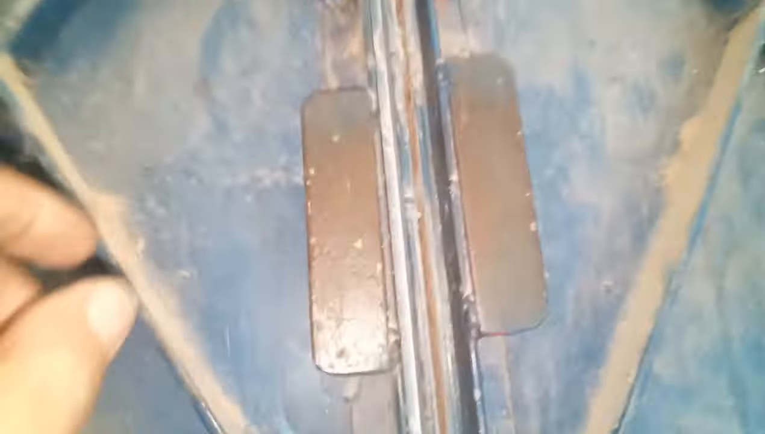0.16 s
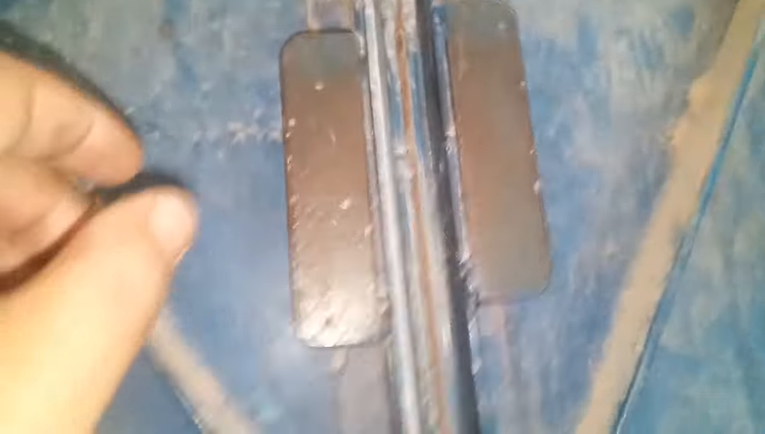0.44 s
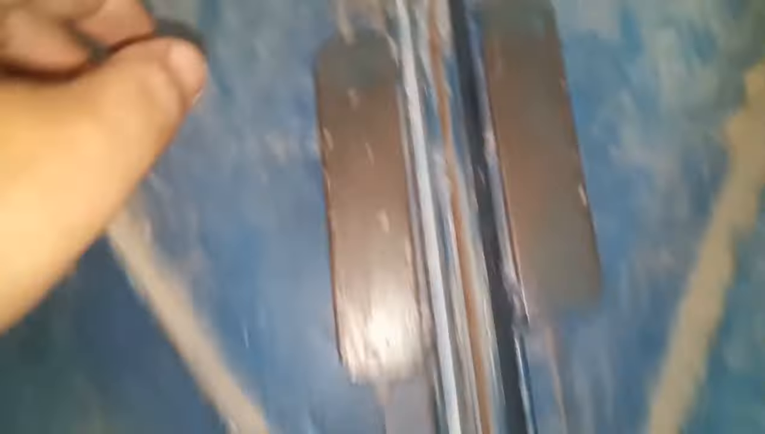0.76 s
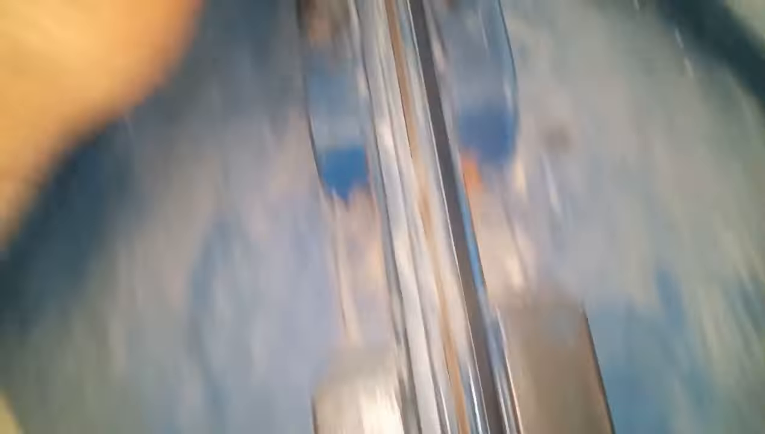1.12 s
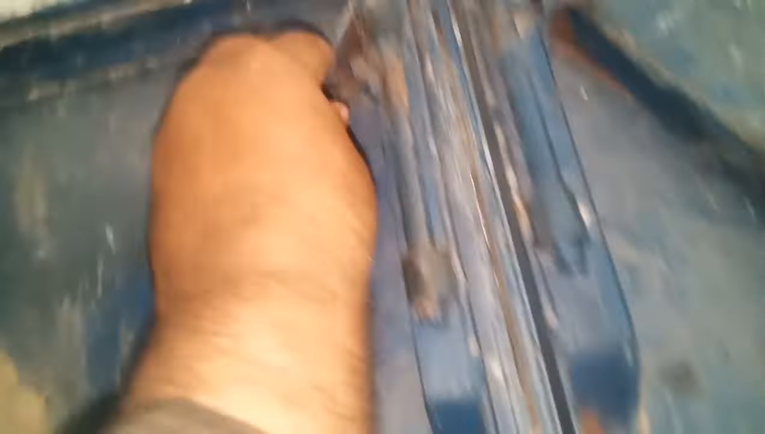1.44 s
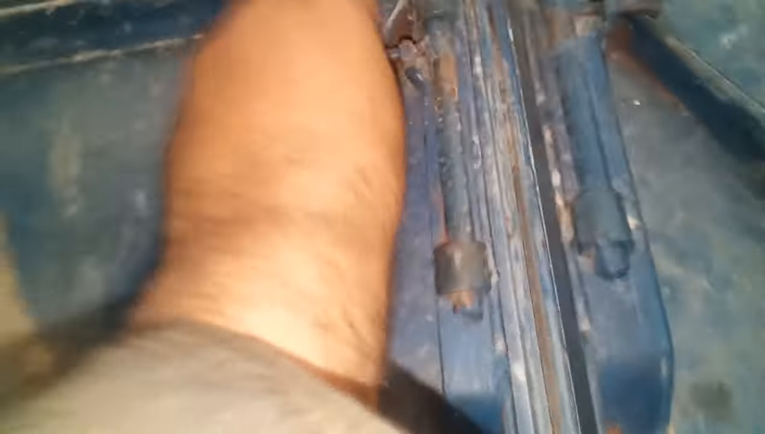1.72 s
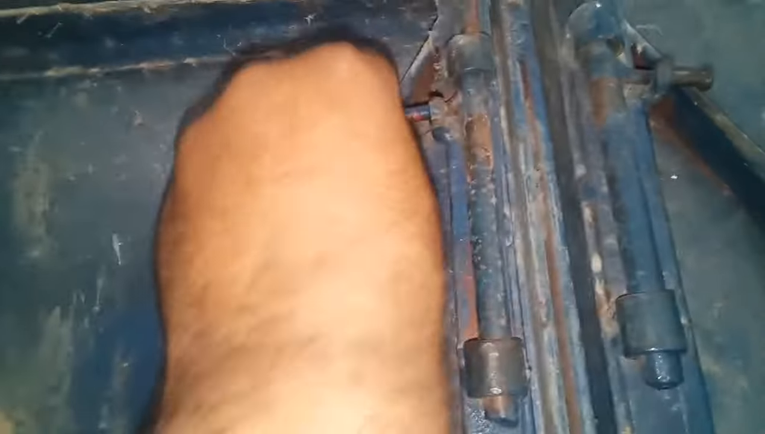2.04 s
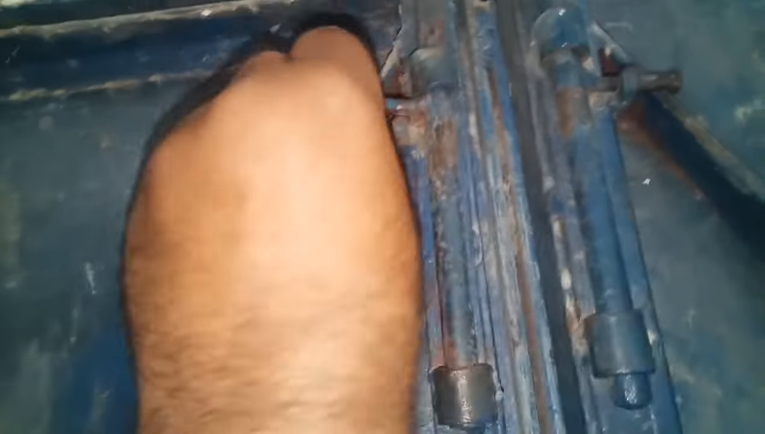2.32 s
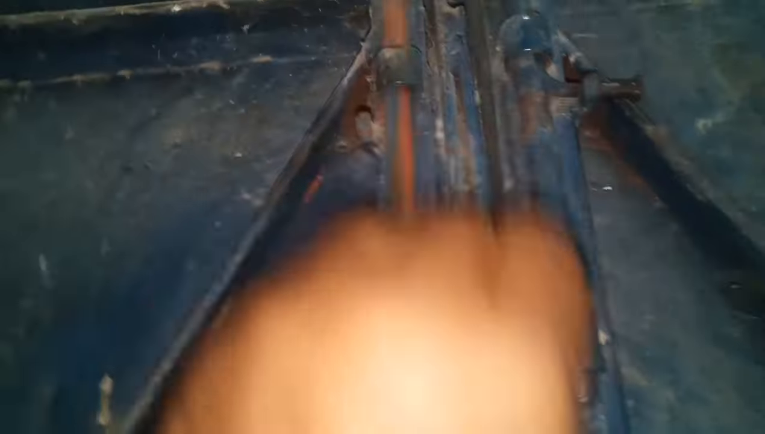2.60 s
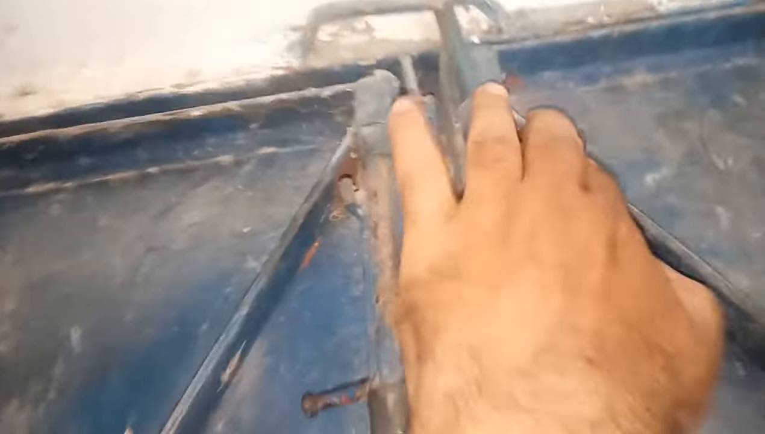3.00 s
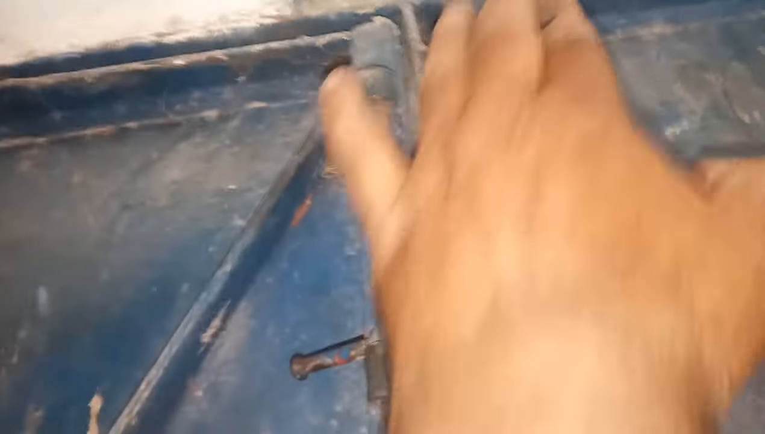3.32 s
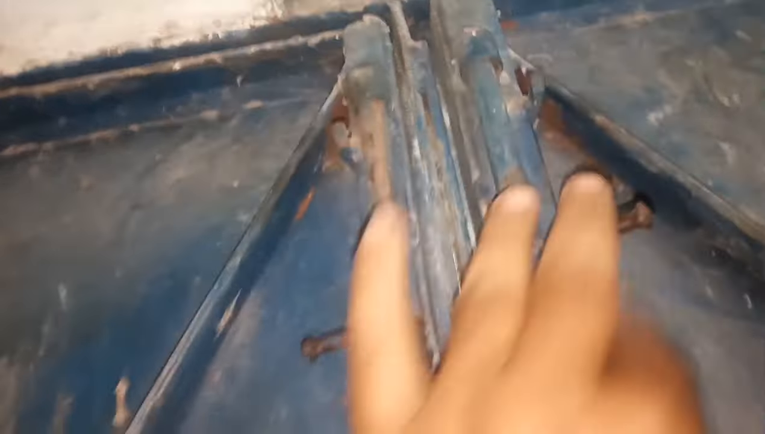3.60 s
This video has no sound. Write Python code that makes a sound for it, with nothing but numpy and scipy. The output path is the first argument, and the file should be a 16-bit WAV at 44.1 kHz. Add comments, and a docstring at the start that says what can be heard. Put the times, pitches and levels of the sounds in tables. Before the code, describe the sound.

Close up in a small room, faint touches on sheet steel give way to hard bolt clanks and gritty scraping, one short high squeal, a momentary dip, then sharp rattling as the door is shoved.

```python
"""Rusty steel door, small shop

A rusty sheet-steel door in a small shop, microphone at arm's length, over a faint steady hush.
A hand brushes the door, then works the stiff bolt: it clanks, grinds, groans and squeals once.
The ring breaks off and the level dips; then the door is shoved and rattles and scrapes in its frame.
Blows (noise bursts) and scrapes (random clicks) all ring the same synthetic panels and room; squeal,
groans, chirp and hum are unsteady tones, dull bumps are damped sines, rust powder is shaped noise."""
import sys
import numpy as np
from scipy import signal
from scipy.fft import rfft, irfft, next_fast_len
from scipy.io import wavfile
from scipy.ndimage import uniform_filter1d, minimum_filter1d

SR = 44100
rng = np.random.default_rng(int(sys.argv[2]) if len(sys.argv) > 2 else 0)


def unload_wav(signal):
    """Save mono or channel-first audio to the path in sys.argv[1] as 16-bit WAV at rate SR, clipped to [-1, 1]."""
    wavfile.write(
        sys.argv[1],
        SR,
        np.round(np.clip(np.atleast_2d(signal).T, -1, 1) * 32767).astype(np.int16),
    )


N = 165375  # 3.75 s

# Hush of the shop. Each row: frequency in Hz, colour in dB.
HUSH_COLOUR = [(18, -33), (30, 4.5), (1920, -10), (2310, -8), (2490, -9), (3590, -3.5), (15000, -41.5)]
HUSH_DB = -69  # rms

# Strong modes of the door. Each row: frequency in Hz, level in dB, free ring time t60 in s.
PANEL_MODES = [(166, 0, .6), (231, -3, .35), (264, -1, .35), (591, -3, .32), (730, -5, .25), (765, -3, .3),
               (1420, -4, .28), (1522, -4, .28), (1647, -4, .28), (2486, -6, .28)]
# Dense panel modes blended with the room. Each row: frequency in Hz, free ring time t60 in s.
DENSE_RING = [(100, 1), (300, 0.28), (800, 0.37), (2000, 0.23), (5000, 0.16), (12000, 0.073)]
CLANG_T60_S = 0.058
DENSE_RING_DB, PANEL_MODES_DB = 1.5, -13  # relative to the clang
PRESSED_RING = 0.58  # share of the ring time left while the steel is pressed and rubbed
# Zones driven separately: treble, bass, middle, fizz. Each row: lower edge in Hz, upper edge in Hz.
ZONES_HZ = [(1900, 6000), (40, 480), (480, 1900), (6000, 17000)]
# Door under a light hand. Each row: frequency in Hz, colour in dB.
BRUSH_COLOUR = [(35, -55.5), (60, -21.5), (127, -8), (163, -6.5), (253, -17.5), (938, -14), (1710, -6.5),
                (3040, 2.5), (3710, 4.5), (8000, -31), (15600, -51)]
# Door worked at the bolt. Each row: frequency in Hz, colour in dB.
BOLT_COLOUR = [(30, -40.5), (50, -29), (75, -21.5), (126, -13.5), (162, -1), (197, -7.5), (266, 2.5),
               (377, -10.5), (548, -13.5), (758, 1), (838, -7.5), (998, -8.5), (1490, -8), (3840, -3),
               (4460, -17.5), (6200, -30), (7160, -33.5), (9890, -46), (15500, -46.5)]
# Door shoved in its frame. Each row: frequency in Hz, colour in dB.
SHOVE_COLOUR = [(30, -54.5), (154, 1), (207, -7), (266, 1.5), (522, -9.5), (686, 1), (1250, 0),
                (1910, -4.5), (2500, 2.5), (3000, -0.5), (3600, -5.5), (4900, -17), (5400, -32),
                (6640, -42.5), (10000, -47), (15500, -51)]
GRIP_S = 1.43  # the hand takes hold of the bolt
BREAK_S = 2.809  # the ring breaks off
SHOVE_S = BREAK_S + .02  # from here the door is shoved

# Rust rubbing on rust. Each row: start in s, end in s, then treble, bass and middle force in dB.
STROKES = [(0.15, 0.272, -43, -65.5, -51), (0.269, 0.458, -50, -62.5, -60.5),
           (0.364, 0.406, -35.5, -77, -48), (0.728, 0.758, -59, -56, -56), (0.854, 1.214, -68.5, -73, -79),
           (1.315, 1.43, -60.5, -49, -58.5), (1.442, 1.526, -30, -17.5, -27.5),
           (1.523, 1.686, -36, -34.5, -34), (1.806, 1.848, -26, -23, -22.5),
           (2.224, 2.282, -24, -31.5, -30), (2.282, 2.439, -38.5, -45, -55), (2.438, 2.604, -35, -29, -24),
           (2.605, 2.689, -20.5, -21, -17), (2.716, 2.821, -31, -41, -31), (2.851, 2.967, -58, -52, -55.5),
           (2.974, 3.14, -67.5, -56.5, -69.5), (3.144, 3.192, -44, -35.5, -43),
           (3.203, 3.312, -30, -31.5, -27.5), (3.315, 3.412, -25.5, -31, -23.5),
           (3.458, 3.531, -20, -29.5, -23.5), (3.607, 3.718, -30, -32, -29.5)]
STROKE_EDGE_S, STROKE_FIZZ_DB = 0.017, -30  # fizz relative to the treble
GRAINS_PER_S, GRAIN_SPREAD_DB = 3000, 3.6
JUDDER_PER_S, JUDDER_DB = 110, 2.8  # pace, and dB per unit of drift

# Dull bumps: soft knocks, panel hum and a low thump as the ring breaks off. Each row: start in s,
# peak of the envelope in dB, pitch in Hz, rise and decay time in s.
BUMPS = [(0.234, -44.5, 168, 0.024), (.253, -39.5, 436, 0.00072), (.6, -33, 476, 0.0008),
         (.608, -49.5, 167, 0.0043), (.889, -49.5, 450, 0.001), (2.803, -31, 69, 0.0033)]

# Steel-on-steel blows. Each row: start in s, treble, bass and middle force in dB,
# chatter decay in s (1 ms at least), bite in dB.
BLOWS = [(1.4443, -27.5, -8.5, -20, .0083, 3), (1.4675, -23, -14.5, -33, 0.0039, 1),
         (1.5436, -23, -40.5, -32.5, 0.006, -5), (1.6026, -17, -20.5, -23, .003, 10),
         (1.6364, -17, -28, -12.5, 0.0065, 0.5), (1.6707, -27, -25.5, -19.5, 0.0051, -2.5),
         (1.7372, -17, -22, -17.5, .004, 7), (1.8025, -11, -15.5, -16.5, 0.0073, 6),
         (1.831, -20, -28, -25, .003, 3), (2.0941, -16.5, -19, -17.5, 0.0087, 6.5),
         (2.1715, -15, -26, -16.5, 0.0022, 12.5), (2.2155, -12.5, -23.5, -15, 0.006, 1.5),
         (2.4696, -21, -23.5, -22.5, 0.015, 4), (2.6085, -17, -23, -19, 0.0099, 4.5),
         (2.7055, -10, -33.5, -23, .004, 1), (2.7175, -14, -29.5, -25, 0.0021, 1),
         (3.1724, -9, -29, -20, .005, 6), (3.1874, -15, -27.5, -23.5, 0.015, 0),
         (3.3148, -16.5, -24, -23.5, 0.0082, 1.5), (3.3825, -19, -21.5, -28.5, 0.0046, 0),
         (3.4401, -14.5, -33.5, -13.5, 0.0086, -0.5), (3.488, -16, -29.5, -29, 0.0049, -1.5),
         (3.5725, -9.5, -30, -15.5, 0.004, 9.5)]
# Light touches on the panel. Each row: the same columns and units as the blows.
TOUCHES = [(0.636, -71, -54, -66, .003, 3), (1.2006, -38, -52.5, -44, 0.025, -3.5),
           (2.069, -56.5, -28, -47.5, 0.023, 0)]
CLICK_SHARE = 0.31  # first click beside chatter of unit energy
BLOW_FIZZ_DB = -29  # relative to the treble
BITE_HZ, BITE_WIDTH_HZ = 5430, 1250  # hard contact stresses this region

# Swells of sizzling rust powder. Each row: peak time in s, spread in s, rms level at the peak in dB.
HISSES = [(1.837, 0.0088, -39.5), (2.269, 0.02, -40), (2.658, 0.016, -39)]
# Sizzle of the powder. Each row: frequency in Hz, colour in dB.
HISS_COLOUR = [(3000, -37), (9500, -12), (13800, -3)]

# Brief groans, a chirp and a low hum. Each row: start in s, length in s, start pitch in Hz,
# end pitch in Hz, level in dB.
LOW_TONES_AND_CHIRP = [(3.3, 0.056, 250, 238, -24), (2.215, .07, 285, 259, -19.5),
                       (2.272, 0.043, 240, 125, -25), (2.247, 0.039, 1500, 2110, -20.5),
                       (2.37, .045, 105, 220, -36.5), (2.715, 0.1, 165, 165.4, -26)]
TONE_WOBBLE = .025  # share of the pitch per unit of drift

# Squeal of the bolt, before flutter and wobble. Each row: time in s, pitch in Hz, level in dB.
SQUEAL = [(2.316, 3520, -51.5), (2.323, 3470, -25.5), (2.335, 3410, -16), (2.346, 3407, -4.5),
          (2.364, 3305, -13.5), (2.381, 3361, -10.5), (2.401, 3190, -15), (2.426, 3223, -25.5),
          (2.477, 3254, -37.5)]
# Harmonics of the squeal, from the fundamental up. Each entry: level in dB.
SQUEAL_HARMONICS_DB = [2.5, -23.5, -45.5, -38]
SQUEAL_WOBBLE, SQUEAL_FLUTTER_DB = .024, 6  # share of the pitch and dB, per unit of drift
SQUEAL_ROOM_DB, SQUEAL_T60_S = -8.5, .25
SQUEAL_ROOM_TOP_HZ = 5000  # the room absorbs the overtones above this
# Modes of the bolt that ring on after the squeal. Each row: frequency in Hz, level in dB, t60 in s.
BOLT_MODES = [(3345, -37, .35), (3210, -32, .3)]
# Near reflections of the squeal. Each row: delay in s, level in dB.
ECHOES = [(.0073, -7.5), (0.017, -9.5), (0.036, -18)]

# The level dips briefly. Each row: start in s, end in s, gain in dB.
DIPS = [(2.69, 2.709, -10.5), (2.814, 2.87, -15)]
DIP_EDGE_S = 0.0035
CEILING, LIMIT_S = .88, .004
TOP_HZ = 15800


def undb(db):
    """Turn dB into an amplitude factor."""
    return 10 ** (np.asarray(db) / 20)


def unit(x):
    """Scale to unit energy."""
    return x / np.sqrt(np.sum(x ** 2) + 1e-18)


def on_log(hz, points):
    """Read (Hz, value) points on a log-frequency axis."""
    f, v = np.array(points).T
    return np.interp(np.log(hz + 1), np.log(f), v)


def shape(x, gain):
    """Causal minimum-phase filter with the gain curve gain(Hz), built by folding its cepstrum."""
    size = next_fast_len(len(x) + 8192) // 2 * 2
    hz = np.arange(size // 2 + 1) * SR / size
    cepstrum = irfft(np.log(gain(hz) + 1e-6))
    cepstrum[1:size // 2] *= 2
    cepstrum[size // 2 + 1:] = 0
    response = np.exp(rfft(cepstrum))
    return irfft(rfft(x, size) * response)[:len(x)]


def coloured_noise(colour):
    """Noise of rms 1 with the colour given by (Hz, dB) points."""
    noise = shape(rng.standard_normal(N), lambda hz: undb(on_log(hz, colour)))
    return np.sqrt(N) * unit(noise)


def band(x, lo, hi, order=4):
    """Band-pass between two edges in Hz."""
    edges = [lo, min(hi, SR / 2 - 1)]
    return signal.sosfilt(signal.butter(order, edges, "band", fs=SR, output="sos"), x)


def fade(t, t60):
    """Exponential decay by 60 dB in t60 seconds."""
    return np.exp(-np.log(1000) * t / t60)


def walk(rate):
    """Smooth random drift with a spread somewhat below 1, turning about rate times a second."""
    steps = np.interp(np.arange(N) / SR * rate, np.arange(N), rng.standard_normal(N))
    return uniform_filter1d(steps, max(int(SR / rate / 2), 1))


def even(x):
    """Level out the broad humps of a random ring and keep its fine modes."""
    spectrum = rfft(x, 2 * len(x))
    hz = np.arange(len(spectrum)) * SR / (2 * len(x))
    grid = np.geomspace(20, SR / 2, 20000)
    power = uniform_filter1d(np.interp(grid, hz, np.abs(spectrum) ** 2), size=600)
    return unit(shape(x, lambda f: np.interp(f, grid, power) ** -.5))


def room_tone():
    """Faint steady hush of the shop: noise with a fixed colour."""
    return undb(HUSH_DB) * coloured_noise(HUSH_COLOUR)


def door_response(ring_share):
    """One tap on the door: a short clang, a dense ring and the strong panel modes."""
    t = np.arange(SR) / SR
    clang = unit(rng.standard_normal(SR) * fade(t, CLANG_T60_S))
    ring = np.zeros(SR)
    edges = np.geomspace(40, 20000, 13)
    for lo, hi in zip(edges, edges[1:]):
        t60 = ring_share * on_log(np.sqrt(lo * hi), DENSE_RING)
        part = band(rng.standard_normal(SR), lo, hi, order=2) * fade(t, t60)
        ring += unit(part) * np.sqrt(2 * (hi - lo) / SR)  # energy by bandwidth
    modes = np.zeros(SR)
    for hz, db, t60 in PANEL_MODES:
        modes += undb(db) * unit(np.sin(2 * np.pi * hz * t) * fade(t, ring_share * t60))
    return even(clang + undb(DENSE_RING_DB) * ring + undb(PANEL_MODES_DB) * unit(modes))


def door():
    """Blows and scrapes ring the door from different spots, coloured by how it is handled."""
    t = np.arange(N) / SR
    forces = (blows(), 1), (scrapes(), PRESSED_RING)

    def rung(when, colour):
        """Forces within one stretch of time, each zone ringing its own band of the door."""
        out = np.zeros(N)
        for force, ring_share in forces:
            tap = shape(door_response(ring_share), lambda hz: undb(on_log(hz, colour)))
            for push, (lo, hi) in zip(force, ZONES_HZ):
                out += signal.fftconvolve(push * when, unit(band(tap, lo, hi)))[:N]
        return out

    handled = rung(t < GRIP_S, BRUSH_COLOUR) + rung(t >= GRIP_S, BOLT_COLOUR)
    break_off = np.clip((BREAK_S - t) * 1000, 0, 1)  # the ring ends within 1 ms
    return break_off * handled + rung(t > SHOVE_S, SHOVE_COLOUR)


def grit():
    """Dense clicks of rust grains catching and letting go, rms 1."""
    hit = rng.random(N) < GRAINS_PER_S / SR
    size = undb(GRAIN_SPREAD_DB * np.minimum(rng.exponential(size=N), 4))
    return unit(hit * size * rng.choice([-1, 1], N)) * np.sqrt(N)


def scrapes():
    """Force in each zone: juddering grit for as long as a stroke lasts."""
    t = np.arange(N) / SR
    effort = np.zeros((4, N))
    for start, end, *dbs in STROKES:
        stroke = np.clip(np.minimum(t - start, end - t) / STROKE_EDGE_S + .5, 0, 1)
        effort += np.outer(undb(dbs + [dbs[0] + STROKE_FIZZ_DB]), stroke)
    return effort * grit() * undb(JUDDER_DB * walk(JUDDER_PER_S))


def bumps():
    """Dull, dry damped sines: soft knocks, panel hum and a low thump as the ring breaks off."""
    t = np.arange(N) / SR
    out = np.zeros(N)
    for start, db, hz, decay in BUMPS:
        age = np.maximum(t - start, 0) / decay
        envelope = age * np.exp(1 - age)  # peaks at 1
        out += undb(db) * envelope * np.sin(2 * np.pi * hz * decay * age)
    return out


def blows():
    """Force in each zone: a hard click, then the loose parts chatter and settle."""
    force = np.zeros((4, N + SR))
    t = np.arange(SR // 6) / SR
    for start, *dbs, chatter, bite_db in list(BLOWS) + list(TOUCHES):
        push = unit(rng.standard_normal(len(t)) * np.exp(-t / max(chatter, .001)))
        push[0] += CLICK_SHARE
        push = shape(push, lambda hz: undb(bite_db * np.exp(-((hz - BITE_HZ) / BITE_WIDTH_HZ) ** 2)))
        zone_gains = undb(dbs + [dbs[0] + BLOW_FIZZ_DB])
        i = int(start * SR)
        # sqrt: as much energy as 16 ms of rms 1
        force[:, i:i + len(t)] += np.outer(zone_gains, push) * np.sqrt(0.016 * SR)
    return force[:, :N]


def hisses():
    """Fine rust powder sizzles in the highest treble, swelling and easing with the pressure."""
    t = np.arange(N) / SR
    pressure = sum(undb(db) * np.exp(-np.abs(t - peak) / spread) for peak, spread, db in HISSES)
    return pressure * coloured_noise(HISS_COLOUR)


def groans_chirp_and_hum():
    """Brief groans, a chirp and a low hum: short, unsteady tones, most of them gliding."""
    t = np.arange(N) / SR
    out = np.zeros(N)
    for start, length, start_hz, end_hz, db in LOW_TONES_AND_CHIRP:
        along = np.clip((t - start) / length, 0, 1)
        glide = start_hz + (end_hz - start_hz) * along
        hz = glide * (1 + TONE_WOBBLE * walk(200))
        out += undb(db) * np.sin(np.pi * along) * np.sin(2 * np.pi * np.cumsum(hz) / SR)
    return out


def squeal_room():
    """Direct sound, near reflections, diffuse tail and the bolt's own modes, as one response."""
    t = np.arange(SR) / SR
    tail = band(rng.standard_normal(SR), 100, SQUEAL_ROOM_TOP_HZ, order=1) * fade(t, SQUEAL_T60_S)
    room = undb(SQUEAL_ROOM_DB) * unit(tail)
    for hz, db, t60 in BOLT_MODES:
        room += undb(db) * unit(np.cos(2 * np.pi * hz * t) * fade(t, t60))
    room[0] += 1
    for delay, db in ECHOES:
        room[int(delay * SR)] += undb(db)
    return room


def squeal():
    """The bolt sticks and slips at a sagging pitch that beats with its own echoes."""
    t = np.arange(N) / SR
    times, pitches, levels = np.array(SQUEAL).T
    hz = np.interp(t, times, pitches) * (1 + SQUEAL_WOBBLE * walk(450))
    phase = 2 * np.pi * np.cumsum(hz) / SR
    tone = sum(undb(db) * np.sin(k * phase) for k, db in enumerate(SQUEAL_HARMONICS_DB, start=1))
    level = undb(np.interp(t, times, levels) + SQUEAL_FLUTTER_DB * walk(200))
    sounding = (t > times[0]) & (t < times[-1])
    return signal.fftconvolve(tone * level * sounding, squeal_room())[:N]


def dips():
    """Gain of the brief dips in level, with ramped edges."""
    t = np.arange(N) / SR
    db = np.zeros(N)
    for start, end, depth in DIPS:
        db += depth * np.clip(np.minimum(t - start, end - t) / DIP_EDGE_S, 0, 1)
    return undb(db)


def scene():
    """All layers at the microphone, one channel, under the same dips."""
    layers = room_tone() + door() + bumps() + hisses() + groans_chirp_and_hum() + squeal()
    return (dips() * layers)[None]


def record(dry):
    """A fast limiter holds the clanks near the ceiling; the top is cut."""
    span = int(LIMIT_S * SR)
    gain = minimum_filter1d(CEILING / np.maximum(np.abs(dry), CEILING), 2 * span)
    gain = uniform_filter1d(uniform_filter1d(gain, span), span)
    low_pass = signal.ellip(10, .2, 80, TOP_HZ, fs=SR, output="sos")
    return signal.sosfilt(low_pass, dry * gain)


dry = scene()
out = record(dry)
unload_wav(out)
```